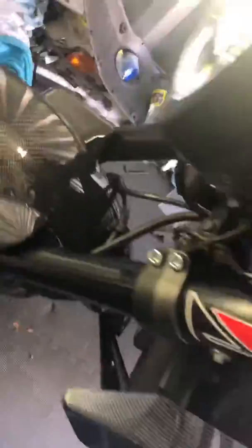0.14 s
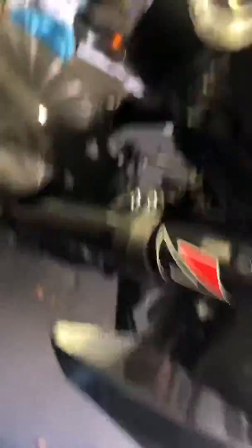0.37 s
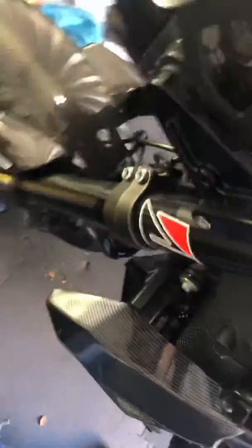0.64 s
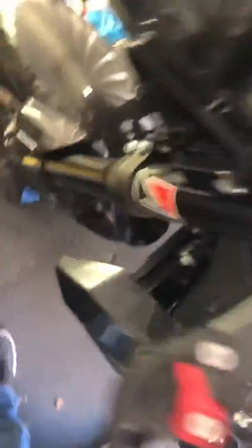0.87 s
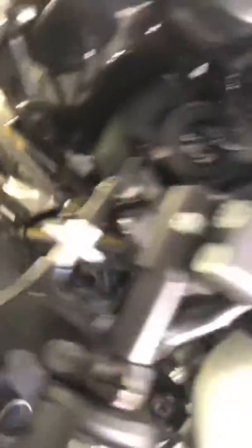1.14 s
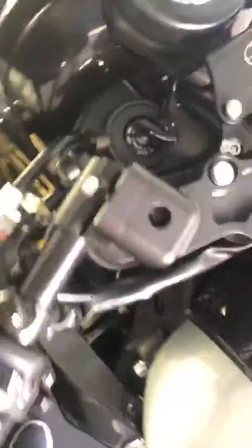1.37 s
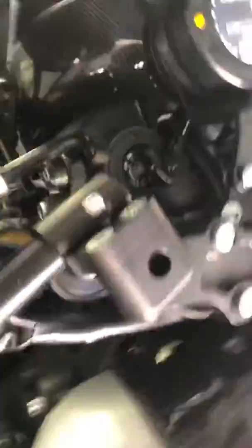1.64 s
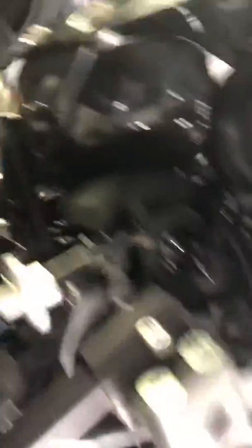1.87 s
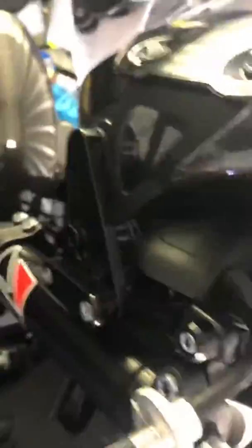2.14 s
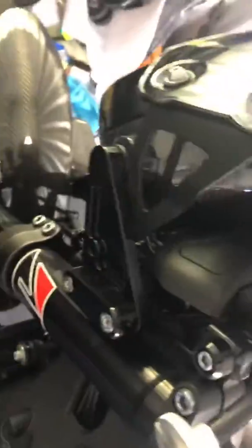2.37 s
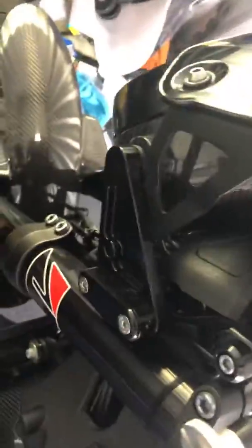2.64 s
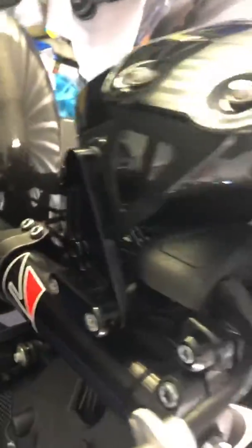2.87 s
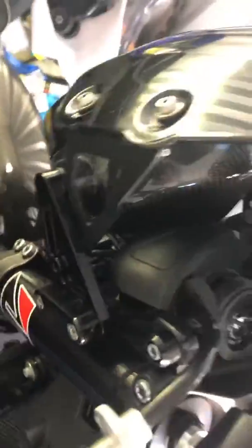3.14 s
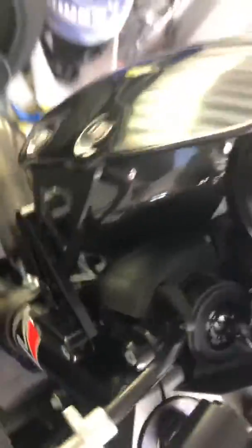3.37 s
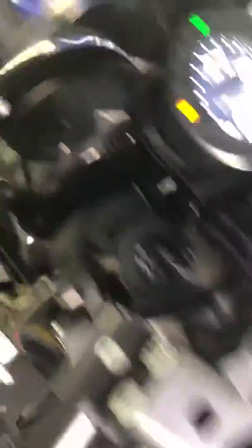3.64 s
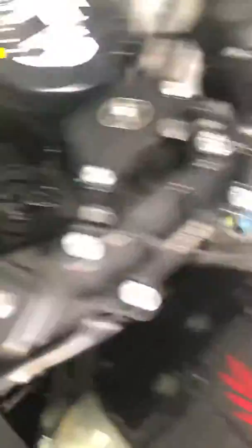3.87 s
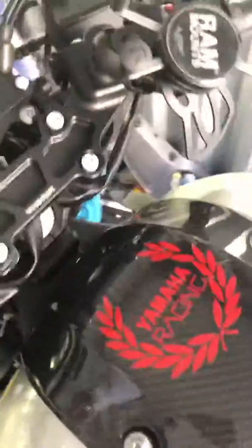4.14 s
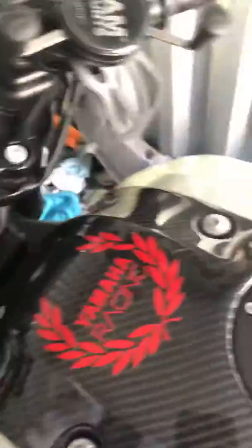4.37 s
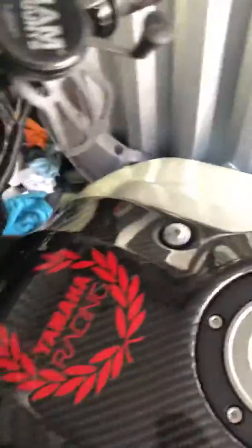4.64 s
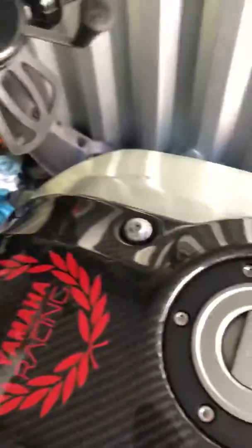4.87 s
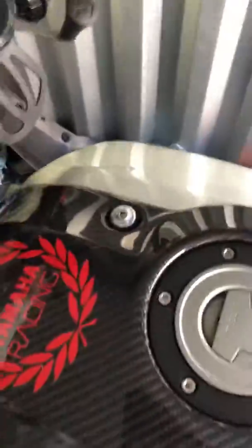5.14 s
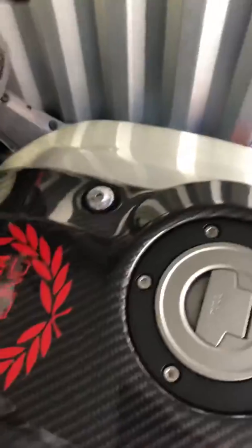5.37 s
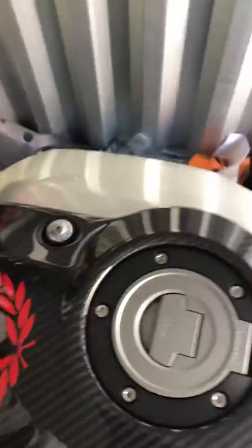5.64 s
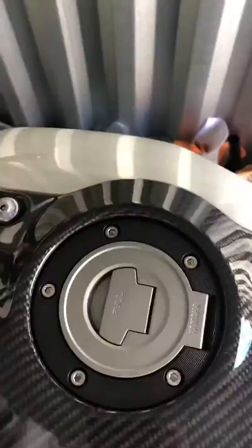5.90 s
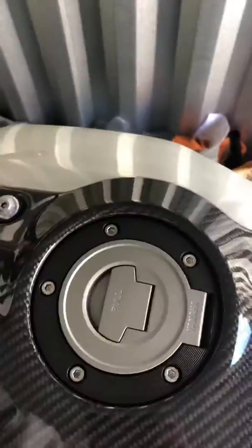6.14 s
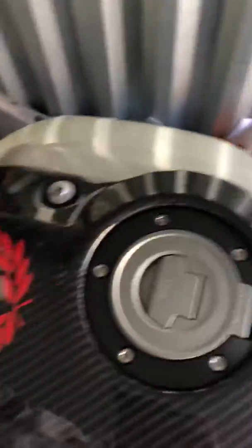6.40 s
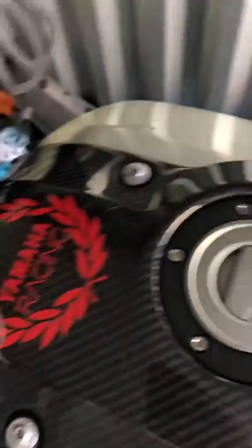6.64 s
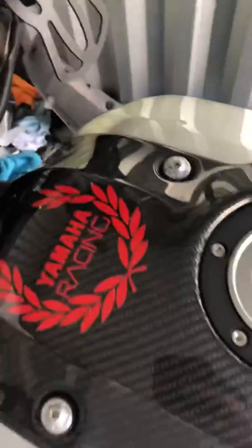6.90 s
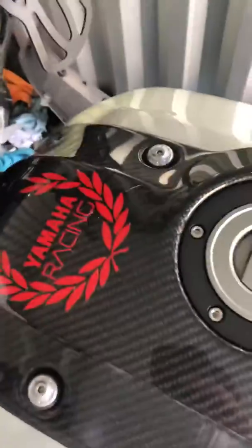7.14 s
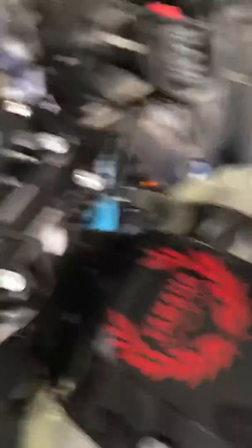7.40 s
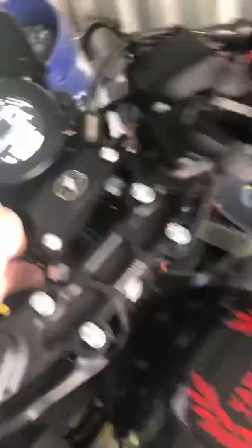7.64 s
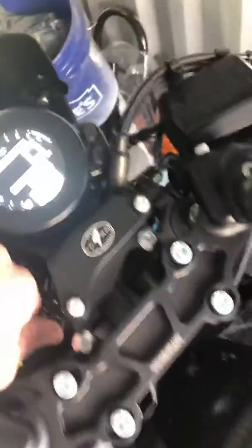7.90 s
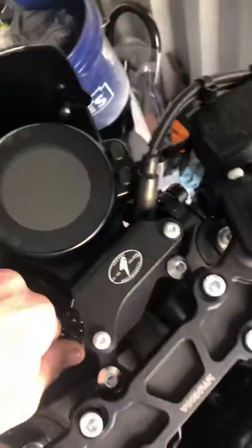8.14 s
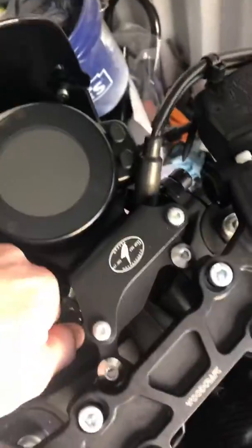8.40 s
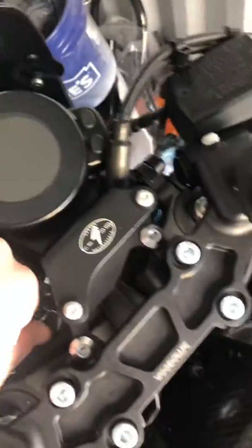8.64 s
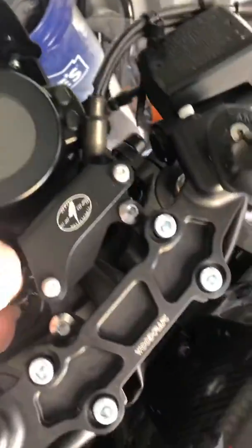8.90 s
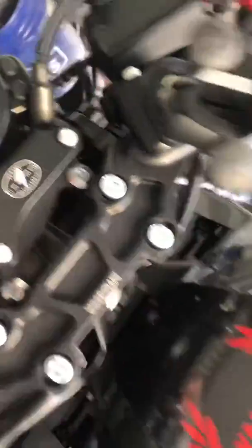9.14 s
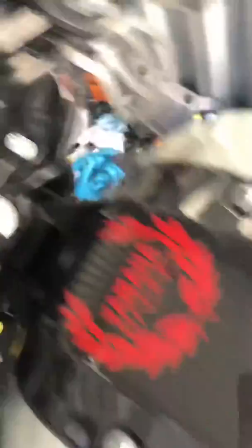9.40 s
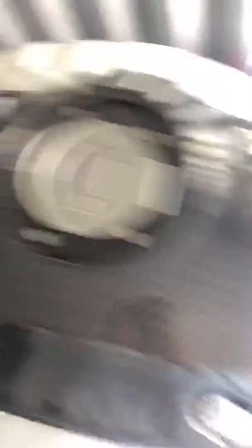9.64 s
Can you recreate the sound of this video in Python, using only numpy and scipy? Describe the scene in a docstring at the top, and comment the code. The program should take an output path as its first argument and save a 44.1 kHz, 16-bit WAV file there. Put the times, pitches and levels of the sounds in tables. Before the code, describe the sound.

Heard close on a hand-held phone in a small steel shed, a motorcycle idles low and fast, slightly lumpy with occasional weak firings, over casing clatter, valve ticking and breathy intake hiss. About six seconds in it is cut, chuffs down and stops with a knock. Quiet hum and hiss remain, with faint clicks, a lock snapping and a bright metallic key jingle.

```python
"""A motorcycle idles inside a steel shed, heard by a hand-held phone moving over it; then it is cut and coasts to rest.
Firing pulses, some of them weak, ring exhaust resonances; noise pulsing with the cycle and struck modes make the
clatter of casing and valve gear, and the intake hisses once a cycle. A faint electric whine of thin tones, the
ignition lock turned and the key drawn out jingling (short cracks, ringing modes, gritty noise) follow.
Under everything lie a low hum and soft hiss."""
import sys
import numpy as np
from scipy import signal
from scipy.fft import rfft, irfft
from scipy.io import wavfile
from scipy.ndimage import uniform_filter1d

SR = 44100
rng = np.random.default_rng(int(sys.argv[2]) if len(sys.argv) > 2 else 0)


def boost(x):
    """Linear amplitude factor 10**(x/20) for a level x in decibels (scalar or array-like)."""
    u = np.asarray(x, float) / 20
    return 10 ** u


def wav_record(signal):
    """Record a signal, one row per channel, as 16-bit PCM in the file named by sys.argv[1]."""
    frames = np.transpose(np.atleast_2d(signal))
    bounded = np.clip(frames, -1, 1)
    # unit amplitude maps onto the largest positive 16-bit level
    quanta = np.round(bounded * 32767).astype(np.int16)
    wavfile.write(sys.argv[1], SR, quanta)


N = 430857
T = np.arange(N) / SR
FIRST_FIRING_S, LAST_FIRING_S = 0.0205, 5.9835
IDLE_HZ = 30.8  # typical firings a second
COAST_S = 0.2  # the cut engine loses speed by 1 / e in this time
JOLT_S = 6.229  # the piston kicks back against compression


def unit(x):
    """Scale to rms 1."""
    return x / np.sqrt(np.mean(x ** 2))


def curves(table):
    """The columns of a table after its time column, drawn sample by sample."""
    s, *columns = np.transpose(table)
    return [np.interp(T, s, column) for column in columns]


def noise(points, source=0):
    """White noise, with any source mixed in, shaped by a (Hz, dB) spectrum; rms 1."""
    hz, db = np.transpose(points)
    log_hz = np.log(np.fft.rfftfreq(N, 1 / SR) + 1)
    gain = boost(np.interp(log_hz, np.log(hz), db, left=-90, right=-90))
    return unit(irfft(rfft(rng.standard_normal(N) + source) * gain, N))


def band(x, hz, width):
    """Two-pole resonance, gain 1 at the centre."""
    centre = min(hz, SR / 2.2)
    return signal.lfilter(*signal.iirpeak(centre, hz / min(width, SR / 3), SR), x)


def walk(rate):
    """Random levels held 1 / rate s and slewed twice; rms 1."""
    k = int(SR / rate)
    steps = np.repeat(rng.standard_normal(N // k + 1), k)
    return unit(uniform_filter1d(uniform_filter1d(steps, k), k)[:N])


def once_a_cycle(phase, at, depth_db):
    """A gain that swells once in each firing cycle."""
    return boost(depth_db * np.cos(2 * np.pi * (phase - at)))


# The idle hunting up and down about five times a second.
# Each row: time in seconds, firings a second.
HUNTING = [(0.0, 30.3), (0.1, 29.9), (0.18, 31.1), (0.31, 30.0), (0.38, 30.6), (0.51, 29.9), (0.59, 31.2),
           (0.7, 30.3), (0.81, 31.6), (0.9, 30.0), (0.95, 32.2), (1.04, 31.0), (1.15, 32.0), (1.28, 29.9),
           (1.35, 31.7), (1.41, 30.3), (1.6, 32.3), (1.65, 30.7), (1.68, 31.3), (1.79, 30.0), (1.84, 30.9),
           (1.98, 29.8), (2.12, 31.7), (2.18, 30.4), (2.49, 32.0), (2.63, 30.1), (2.7, 32.1), (2.82, 29.9),
           (2.9, 32.0), (3.03, 29.6), (3.16, 32.3), (3.25, 30.1), (3.38, 31.9), (3.44, 30.4), (3.57, 31.4),
           (3.65, 29.7), (3.76, 31.4), (3.84, 29.7), (3.97, 32.0), (4.11, 30.0), (4.18, 31.7), (4.24, 29.8),
           (4.37, 32.1), (4.47, 30.2), (4.56, 31.5), (4.71, 30.0), (4.85, 31.1), (4.91, 29.7), (5.06, 31.3),
           (5.1, 30.5), (5.25, 31.7), (5.29, 30.6), (5.37, 31.1), (5.59, 29.3), (5.75, 31.6), (5.86, 30.2),
           (5.94, 31.6), (5.97, 30.5)]
# Firings that stand out, weak or strong.
# Each row: time in seconds, level in dB against a plain firing.
STANDOUT_FIRINGS = [(.086, -6), (.2837, -4), (.417, -2), (.583, 1.5), (.6806, -7.5), (.8127, -16),
                    (.947, 2), (.978, 2), (1.0111, -24), (1.139, 1.5), (1.2671, -3), (1.334, 2), (1.366, 2),
                    (1.3982, -24), (1.464, -2), (1.558, 3), (1.5903, -7), (1.69, 3), (1.751, -4.5),
                    (1.7794, -31), (1.943, -2), (2.107, 1.5), (2.172, -1.5), (2.5614, -14), (2.692, 2),
                    (2.7559, -3.5), (2.887, 2), (2.9516, -3), (3.0182, -5), (3.145, 1.5), (3.209, -3),
                    (3.34, 1.5), (3.404, -7.5), (3.4676, -3), (3.565, 1.5), (3.5978, -3), (3.731, 2),
                    (3.7971, -3), (3.8311, -14), (3.964, 3), (4.1905, -3.5), (4.2215, -5), (4.353, 2),
                    (4.384, -3), (4.547, 1.5), (4.677, -1.5), (4.873, -3), (5.0731, -4.5), (5.201, 1.5),
                    (5.2619, -6), (5.394, -2), (5.559, -2.5), (5.692, 1.5), (5.756, 1.5), (5.919, 1.5),
                    (5.95, -3)]


def crank():
    """Cycles turned: speed summed over the hunting idle, then over an exponential coast."""
    hz = curves(HUNTING)[0] * np.exp(-np.maximum(T - LAST_FIRING_S, 0) / COAST_S)
    turned = np.cumsum(hz) / SR
    # bend the count so that whole cycles fit between the strong firings
    strong = [s for s, db in STANDOUT_FIRINGS if db > 0]
    marks = np.r_[FIRST_FIRING_S, strong, LAST_FIRING_S]
    there = np.interp(marks, T, turned)
    whole = np.r_[0, np.cumsum(np.round(np.diff(there)))]
    return turned + np.interp(T, marks, whole - there)


# Unfired exhaust strokes while the crank coasts down.
# Each row: start in seconds, level in dB against a plain firing.
COAST_STROKES = [(6.019, 1), (6.062, -1), (6.111, -1), (6.206, -6), (6.224, -13), (6.24, -18), (6.286, -20)]


def firings(phase):
    """One pressure pulse a cycle, scattered in strength and moment; unfired strokes are slow soft pushes."""
    advance = 0.08  # part of a cycle by which the pulse leads the crank mark
    rebound_db = 2  # the charge left by a missed firing strengthens the next one
    scatter_db, scatter_s, push_s = 0.9, 0.0002, 0.0083
    at = np.flatnonzero(np.diff(np.floor(phase + advance)) > 0)
    at = at[at < (LAST_FIRING_S + 0.5 / IDLE_HZ) * SR]
    # the engine was already running: two earlier firings wrap round to the end
    at = np.r_[at[0] - (np.array([2, 1]) * SR / IDLE_HZ).astype(int), at]
    size, late = rng.standard_normal((len(at), 2)).T
    db = scatter_db * size
    for s, standout_db in STANDOUT_FIRINGS:
        k = np.argmin(abs(at / SR - s))
        db[k] = standout_db
        db[k + 1] += rebound_db * max(1 - boost(standout_db), 0)
    pulses = np.zeros(N)
    pulses[at + (scatter_s * SR * late).astype(int)] = boost(db)
    push = np.hanning(int(push_s * SR))
    for s, coast_db in COAST_STROKES:
        i = int(s * SR)
        pulses[i:i + len(push)] = boost(coast_db) * push / push.sum()
    return pulses


# The phone moving about the shed.
# Each row: time in seconds, distance from the wall in m, nearness to the engine in dB,
# view of the crankcase in dB.
PHONE_PATH = [(0, 1.02, 1, 3), (.5, 0.99, 0, 3.5), (1.0, 1.03, 0, 1), (1.6, 1.12, 0.5, 0.5),
              (2.2, 1.005, 0.5, 3.5), (2.8, 1.01, 0.5, 3.5), (3.3, 1, 0.5, 3), (3.8, 1.054, 1, -3),
              (4.2, 1.25, 1, -4), (4.7, 1.245, 1, -9), (5.2, 1.31, 1.5, -17), (5.6, 1.23, 1, -5),
              (6, 1.31, 0.5, -7)]
# Exhaust resonances, each by its own path to the phone.
# Each row: centre in Hz, width in Hz, later arrival in seconds, level in dB rms before echo and movement,
# share of the nearness, m farther for each m nearer the wall.
PIPE_MODES = [(65.16, 8.7, 0, -14.5, .3, 0), (117.6, 26.2, 0.0025, -17.7, 1.0, 1.9),
              (153, 16, .0023, -33, 2.5, 1.2), (186.4, 22.8, 0.0024, -23.5, .7, 1.2),
              (245.5, 9, 0.0038, -38.5, 1.6, 0)]
# Low rough noise under the exhaust pulses.
# Each row: frequency in Hz, level in dB per Hz (shape only).
BURBLE_SPECTRUM = [(45, -20), (75, 0), (150, -2), (215, -4), (280, -30)]
# A long-ringing standing wave of the shed. Each row: centre in Hz, width in Hz, level in dB rms.
SHED_MODES = [(121.5, 1.4, -39)]


def exhaust(pulses):
    """The silencer passes only the thump, which rings pipe resonances and the shed; the near wall echoes it."""
    wall_echo = 0.56  # share of the pressure that the wall returns
    engine_m, sound_m_s = 1.25, 343  # engine to wall; speed of sound
    burble_db, waver_db = -34, 0.7
    lead = SR // 10
    silencer = signal.cheby2(6, 32, 305, fs=SR, output="sos")
    thump = signal.sosfilt(silencer, np.roll(pulses, lead))
    # the open end inverts the pulse and radiates almost nothing as low as the firing rate
    open_end = signal.butter(4, 47, "high", fs=SR, output="sos")
    thump = -signal.sosfilt(open_end, thump - band(thump, IDLE_HZ, 8))
    running = int(LAST_FIRING_S * SR)
    wall_m, near_db, _ = curves(PHONE_PATH)
    early = T - lead / SR
    pipe = 0
    for hz, width, late, db, share, away in PIPE_MODES:
        late = late + away * (engine_m - wall_m) / sound_m_s
        ring = band(thump, hz, width)
        ring = ring / ring[:running].std()
        heard = np.interp(T - late, early, ring, right=0)
        echo = np.interp(T - late - 2 * wall_m / sound_m_s, early, ring, right=0)
        # turbulent gas makes every resonance waver a little on its own
        pipe = pipe + (heard + wall_echo * echo) * boost(db + share * near_db + waver_db * walk(25))
    # the rough noise follows the smoothed pulses
    follow = uniform_filter1d(uniform_filter1d(pulses, SR // 31), SR // 31)
    follow = follow * (T < JOLT_S) / follow[:running].mean()
    pipe = pipe + boost(burble_db) * noise(BURBLE_SPECTRUM) * follow
    # a dip in the exhaust sound around 91.7 Hz, 17 Hz wide
    pipe = pipe - 0.64 * band(pipe, 91.7, 17)
    return pipe + sum(boost(db) * unit(band(pipe, hz, width)) for hz, width, db in SHED_MODES)


# Metal modes of the cylinder head.
# Each row: centre in Hz, width in Hz, level in dB against each other.
TAPPET_MODES = [(808, 28, 4), (1055, 56, 2.5), (1866, 55, 4), (2000, 58, -3), (2960, 90, -2),
                (3820, 160, -10)]


def tappets(phase, count=4):
    """Several uneven metal ticks a cycle ring the cylinder head."""
    scatter_db, scatter_s = 4.5, 0.0015
    at = np.flatnonzero(np.diff(np.floor(count * phase)) > 0)
    size, late = rng.standard_normal((len(at), 2)).T
    at = np.clip(at + (scatter_s * SR * late).astype(int), 0, N - 1)
    ticks = np.zeros(N)
    ticks[at] = boost(scatter_db * size.clip(-2, 2))
    ticks = np.convolve(ticks, rng.standard_normal(SR // 500))[:N]
    return unit(sum(boost(db) * unit(band(ticks, hz, width)) for hz, width, db in TAPPET_MODES))


# Noise colours of casing, valve gear and intake.
# Each row: frequency in Hz, level in dB per Hz (shape only).
CASING_SPECTRUM = [(160, -7), (270, -1.5), (312, -12.5), (434, -3.5), (488, -9), (594, -11), (789, -7),
                   (859, -20), (954, -13), (1300, -22), (1690, -29), (2860, -120)]
VALVE_SPECTRUM = [(650, -4), (1100, -4.5), (1520, -4), (1950, -4), (2520, -6), (2990, -4), (3350, -9),
                  (3960, -7.5), (4400, -13.5), (5000, -15.5), (6500, -33), (11000, -120)]
INTAKE_SPECTRUM = [(2530, -12), (4300, -5), (5990, -4.5), (8000, -5), (9630, -4.5), (14500, -9),
                   (15800, -10)]
# Ringing modes of the casing.
# Each row: centre in Hz, width in Hz, level in dB against each other.
CASE_MODES = [(420, 110, -19), (538, 30, -7), (798.6, 22, -2), (956, 88, -4), (1264, 25, -8),
              (1087, 26, -16), (670, 110, -19), (327, 27, -2.5)]
# Loudness of casing, valve gear and intake, in that order.
# Each row: level at idle in dB before movement, power of speed that the level follows,
# level at the last jolt in dB, t60 of the jolt in seconds.
PART_LEVELS = [(-33, 1.15, -34, 0.51), (-36.5, 1.4, -39, 0.43), (-44, 1.54, -41, 0.18)]


def works(pulses, phase):
    """Casing, valve gear and intake: rough noise pulsing with the cycle, fading with speed, and a last jolt."""
    near_share = 0.41  # how much of the nearness the mechanical noise follows
    crankcase_hz, crankcase_width_hz = 407, 52  # low ring that comes from the side of the engine
    tappet_db = -6.5  # against the valve noise
    speed = np.exp(-np.maximum(T - LAST_FIRING_S, 0) / COAST_S)
    _, near_db, view_db = curves(PHONE_PATH)
    gains = []
    for db, power, jolt_db, t60 in PART_LEVELS:
        turning = boost(db + near_share * near_db) * speed ** power
        jolt = boost(jolt_db) * (T > JOLT_S) * 1000. ** (-abs(T - JOLT_S) / t60)
        gains.append(np.hypot(turning, jolt))
    casing_gain, valve_gain, intake_gain = gains
    # part of the clatter is the same on every cycle
    pattern = rng.standard_normal(SR // 31)
    clatter = pattern[(phase % 1 * len(pattern)).astype(int)]

    shove = band(np.roll(pulses, SR // 200), 660, 460)
    shove = shove + 0.014 * rng.standard_normal(N) * once_a_cycle(phase, 0.32, 3.1)
    rung = sum(boost(db) * unit(band(shove, hz, width)) for hz, width, db in CASE_MODES)
    rough = noise(CASING_SPECTRUM, 0.2 * clatter) * once_a_cycle(phase, 0.074, 1.0)
    casing = unit(rung + boost(7.0) * rough * boost(0.97 * walk(30)))
    casing = casing + (boost(view_db) - 1) * band(casing, crankcase_hz, crankcase_width_hz)

    valves = noise(VALVE_SPECTRUM, 0.57 * clatter) * once_a_cycle(phase, 0.17, 0.31)
    valves = valves * boost(1.0 * walk(90) + 0.61 * walk(14))
    valves = valves + boost(tappet_db) * tappets(phase)

    intake = noise(INTAKE_SPECTRUM) * once_a_cycle(phase, 0.78, 1.5)
    intake = intake * boost(1.0 * walk(60) + 0.69 * walk(8))
    return casing * casing_gain + unit(valves) * valve_gain + unit(intake) * intake_gain


# Colours of the low rumble and the soft hiss.
# Each row: frequency in Hz, level in dB per Hz (shape only).
RUMBLE_SPECTRUM = [(15, -49), (25, -31), (54, -1.5), (86, -10.5), (107, -10), (123, 2.5), (167, -15.5),
                   (252, -13), (295, -12.5), (317, -20), (450, -28.5), (580, -58), (990, -120)]
HISS_SPECTRUM = [(210, -31), (350, 1), (855, 6), (1030, 0), (4630, -19.5), (6170, -15), (6470, -19),
                 (9040, -20), (15800, -27)]


def surroundings():
    """Distant rumble with a wavering hum, and soft hiss, both shaped noise."""
    rumble_db, hiss_db = -54, -60.5
    # the hiss is held low while the engine turns, then comes up slowly after the jolt
    dip_db, back_s = -32, 0.37
    hiss_db = hiss_db + dip_db * np.exp(-np.maximum(T - JOLT_S, 0) / back_s)
    rumble = noise(RUMBLE_SPECTRUM) * boost(rumble_db + 0.73 * walk(6.8))
    return rumble + noise(HISS_SPECTRUM) * boost(hiss_db + 1.0 * walk(10))


# Electric tones. Each row: pitch in Hz, level in dB rms before swell and waver, share of the swell.
WHINE_TONES = [(2970, -83.5, .4), (5997, -79, 0.77), (9001, -86.5, .1), (12000, -89, .05),
               (15000, -94, 0.11)]


def whine():
    """Thin wavering electric sines; they swell once, each by its share, and stop when the ignition is off."""
    off_s, fade_s = 8.47, 0.022
    swell_s, swell_width_s, swell_top_db = 7.37, 0.1, 15
    swell_db = swell_top_db * np.exp(-((T - swell_s) / swell_width_s) ** 2)
    tones = 0
    for hz, db, share in WHINE_TONES:
        level_db = db + share * swell_db + 1.5 * walk(29) + 0.82 * walk(6)
        tones = tones + boost(level_db) * np.sqrt(2) * np.sin(2 * np.pi * hz * T)
    return tones * np.clip((off_s - T) / fade_s, 0, 1)


def blows(events, modes, crack_s, reach_db, rise_s):
    """Each blow: a short noisy crack; it rings most the modes near its own pitch, which take a moment to rise."""
    out, t = np.zeros(N), T[:SR // 3]
    for s, db, crack_hz, ring_db in events:
        crack = rng.standard_normal(len(t)) * np.exp(-t / crack_s)
        crack = band(crack, crack_hz, 0.86 * crack_hz)
        crack = band(crack, crack_hz, 2.2 * crack_hz)
        ring = 0
        for hz, mode_db, t60 in modes:
            level_chance, pitch_chance = rng.standard_normal(2)
            # reach_db is lost for each octave away from the crack
            level_db = mode_db + 2.0 * level_chance - reach_db * abs(np.log2(hz / crack_hz))
            tone = np.sin(2 * np.pi * hz * (1 + 0.007 * pitch_chance) * t)
            ring = ring + boost(level_db) * tone * 1000. ** (-t / t60)
        ring = (1 - np.exp(-t / rise_s)) * ring / abs(ring).max()
        blow = crack / abs(crack).max() + boost(ring_db) * ring
        i = int(s * SR)
        out[i:i + len(t)] += boost(db) * blow[:N - i]
    return out


def chatter(count=16):
    """The key blade chatters over the lock pins: ticks at chance moments, uneven in strength and pitch."""
    from_s, to_s, level_db, centre_hz, ring_db = 8.885, 8.96, -30.5, 7100, -16
    when, size, pitch = rng.uniform(-0.63, 1, (count, 3)).T
    s = from_s + (to_s - from_s) * (np.arange(count) + (1 + when) / 2) / count
    return [(a, level_db + 3.8 * b, centre_hz * 2 ** (0.37 * c), ring_db) for a, b, c in zip(s, size, pitch)]


# Sharp cracks of the engine stopping, then lock, keys and small metal parts touching.
# Each row: start in seconds, peak of the crack in dB, crack pitch in Hz, ring in dB against the crack.
TICKS = [(6.2295, -32, 2880, -9.5), (6.2345, -29, 2490, -10.5), (7.0827, -48.5, 5530, 5),
         (7.083, -56, 4100, 2), (7.195, -47, 5500, 5), (7.1955, -53, 4100, 2), (7.262, -58, 4200, -2),
         (7.5404, -44, 2510, -17), (7.6236, -50, 5440, -2), (7.6644, -50, 11200, -6),
         (7.7348, -57, 2800, -3), (8.042, -44, 3500, 0), (8.043, -41, 6410, -3), (8.1313, -32, 2300, -18),
         (8.134, -32, 950, -22), (8.274, -54, 5000, 2), (8.331, -45, 5040, -4), (8.484, -48, 3130, -11),
         (8.877, -30, 6050, -7), (8.9905, -20, 3360, -4), (8.994, -13, 7250, -7), (8.997, -15, 12400, -7),
         (9.0046, -20.5, 3160, -9.5), (9.0455, -23.5, 2850, 1), (9.0502, -13, 3050, -2.5),
         (9.0545, -12, 2950, 2.5), (9.0611, -24, 2960, -10), (9.1087, -31.5, 2900, 6),
         (9.1134, -42, 2940, -6), (9.1255, -21.5, 5150, 2), (9.1485, -24, 3050, 3), (9.1565, -35, 3120, 2),
         (9.157, -21, 6000, -13), (9.2853, -51, 5550, -3), (9.3352, -54, 4430, -6), (9.357, -55, 5000, -6)]
# Ringing of small metal. Each row: pitch in Hz, level in dB against each other, t60 in seconds.
TICK_MODES = [(1740, -9, .08), (2850, 8, 0.042), (2960, 14, 0.03), (3198, -8, 0.17), (3720, 1, .027),
              (4050, 2, 0.036), (5200, 10, 0.019), (5500, -6, 0.11), (7100, 7, 0.02), (12400, -6, 0.025)]


def sharp_ticks():
    """Light metal: very short cracks ring small stiff parts, bright and quick to rise."""
    return blows(TICKS + chatter(), TICK_MODES, crack_s=0.0016, reach_db=33.0, rise_s=0.00034)


# The engine rocking to rest, the hand at the lock, its barrel snapping round.
# Each row: start in seconds, peak of the crack in dB, crack pitch in Hz, ring in dB against the crack.
KNOCKS = [(6.231, -30.5, 991, -5), (6.314, -45, 700, 11), (6.389, -40.5, 1700, -8),
          (7.084, -59, 1175, -23.5), (7.196, -49, 1500, -13), (7.4145, -46, 1700, -8),
          (7.541, -45, 1500, -7), (8.064, -31.5, 1330, 2.5), (8.1315, -38, 2300, 3), (8.331, -45, 2300, -6),
          (8.375, -41, 330, -27), (9.0, -34, 800, -9.5), (9.055, -43, 1100, -5)]
# Ringing of the heavier parts. Each row: pitch in Hz, level in dB against each other, t60 in seconds.
KNOCK_MODES = [(710, 4.5, 0.32), (1010, -9, .04), (1437, 0, 0.076), (1550, -6, 0.12), (1700, -15, 0.15),
               (2300, -9, 0.035)]


def knocks():
    """Heavier parts: longer cracks ring lower modes that rise more slowly."""
    return blows(KNOCKS, KNOCK_MODES, crack_s=0.007, reach_db=8.0, rise_s=0.0034)


# Parts creaking and scraping as they settle or slide.
# Each row: start in seconds, length in seconds, centre in Hz, width in Hz, level in dB rms before the swell shape.
SQUEAKS = [(6.388, 0.13, 1670, 300, -56), (6.44, .05, 760, 120, -55), (6.794, 0.025, 2280, 200, -70),
           (6.963, 0.05, 2050, 250, -67), (7.005, .055, 2200, 220, -70), (7.075, 0.028, 2200, 400, -71),
           (8.897, 0.081, 226, 150, -47.5), (8.905, 0.11, 1470, 260, -46)]


def squeaks():
    """Stick-slip: dense uneven clicks ring one loose resonance, strongest near the start."""
    out = 0
    for s, length, hz, width, db in SQUEAKS:
        slips = rng.standard_normal(N) ** 3 * boost(2.2 * walk(90))
        creak = unit(band(band(slips, hz, width), hz, 1.7 * width))
        done = np.clip((T - s) / length, 0, 1)
        out = out + boost(db) * creak * np.sin(np.pi * done ** 0.58) ** 0.4
    return out


def shed(x):
    """Steel walls answer with a short dense tail of decaying noise."""
    t60_s, tail_db = 0.18, -16
    t = T[:SR // 2]
    tail = band(rng.standard_normal(len(t)), 1900, 6800) * 1000. ** (-t / t60_s) * (t > 0.003)
    return x + boost(tail_db) * signal.fftconvolve(x, tail / np.sqrt(np.sum(tail ** 2)))[:N]


# Colour of the rubbing. Each row: frequency in Hz, level in dB per Hz (shape only).
RUB_SPECTRUM = [(290, -30), (500, -6), (586, -18), (649, -7.5), (1350, -6.5), (5750, -9.5), (8610, -10),
                (15800, -4.5)]
# Key blade sliding, hand and sleeve rubbing, and short noisy tails after metal ticks.
# Each row: start of the hold in seconds, hold in seconds, level in dB before dulling, dull above Hz.
RUBS = [(7.085, .012, -64, 9000), (7.193, .012, -62, 12000), (7.42, .02, -64, 4000),
        (7.546, .008, -61, 9000), (7.657, .018, -61, 15000), (7.76, .05, -71, 4000),
        (8.045, 0.034, -44, 9000), (8.134, .015, -62, 4970), (8.198, 0.16, -60, 2800),
        (8.587, .02, -64, 14000), (8.673, 0.033, -59.5, 14000), (8.877, 0.081, -36, 15000),
        (8.99, .01, -34, 15000), (9.05, 0.01, -35, 9000), (9.144, 0.016, -47, 14000),
        (9.574, 0.078, -59.5, 8000), (9.666, 0.044, -49.5, 4000)]


def sliding():
    """Gritty rubs and noisy tails: noise in dense uneven grains; each one rises, holds and falls."""
    rise_db_s, fall_db_s = 5000, 351
    grit = unit(noise(RUB_SPECTRUM) * boost(2.7 * walk(400) + 1.5 * walk(75)))
    out = 0
    for s, hold, db, top_hz in RUBS:
        rise_db = rise_db_s * np.maximum(s - T, 0)
        fall_db = fall_db_s * np.maximum(T - s - hold, 0)
        out = out + boost(db - rise_db - fall_db) * signal.lfilter(*signal.butter(1, top_hz, fs=SR), grit)
    return out


def scene():
    """Engine, surroundings, hand at the lock."""
    phase = crank()
    pulses = firings(phase)
    engine = exhaust(pulses) + works(pulses, phase)
    small_parts = shed(sharp_ticks() + knocks() + squeaks())
    return (engine + surroundings() + whine() + small_parts + sliding())[None]


def roll_off(x):
    """The treble ends steeply here."""
    return signal.sosfilt(signal.butter(12, 16100, fs=SR, output="sos"), x)


def record(dry):
    """The phone rounds the loudest peaks and a steep filter cuts the top."""
    headroom, top_hz = 2.6, 15780
    rounded = headroom * np.tanh(dry / headroom)
    mix = signal.sosfilt(signal.ellip(10, 0.2, 70, top_hz, fs=SR, output="sos"), rounded)
    return roll_off(mix)


dry = scene()
out = record(dry)
wav_record(out)
```